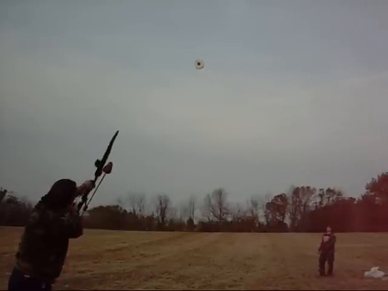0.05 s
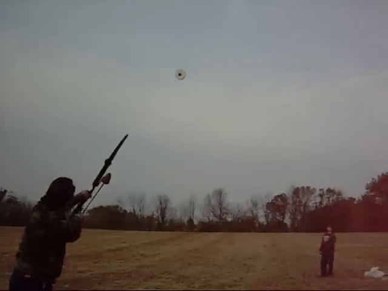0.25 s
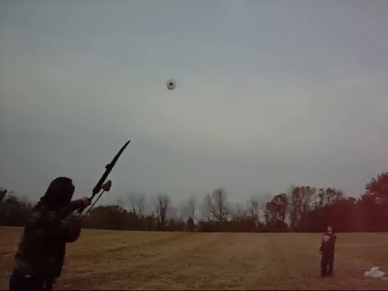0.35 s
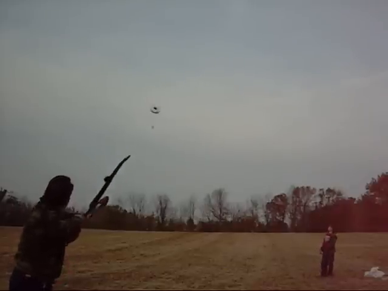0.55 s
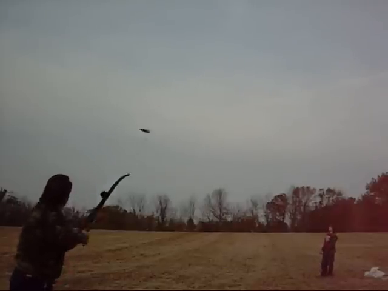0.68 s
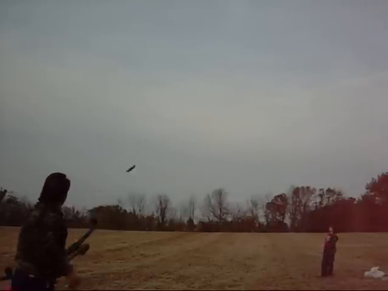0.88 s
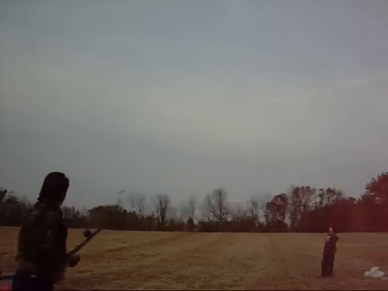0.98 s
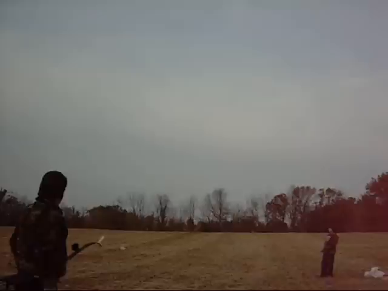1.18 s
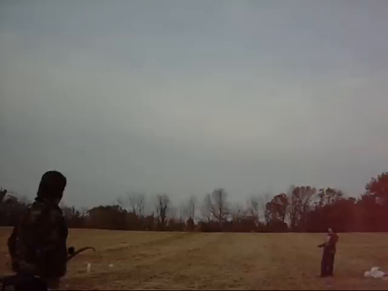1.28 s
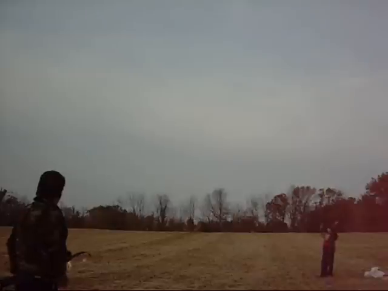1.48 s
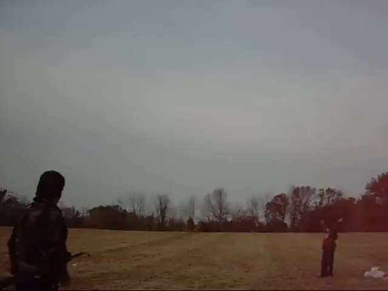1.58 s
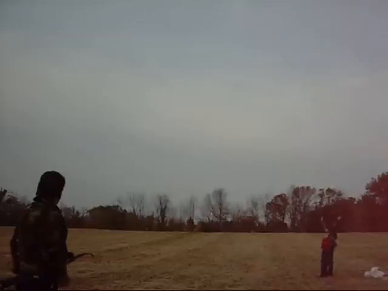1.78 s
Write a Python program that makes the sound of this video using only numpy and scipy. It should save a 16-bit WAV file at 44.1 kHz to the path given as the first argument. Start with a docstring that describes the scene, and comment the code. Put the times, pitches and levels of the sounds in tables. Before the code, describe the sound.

An arrow is shot outdoors: the string slaps the bow, feathers hiss briefly, and a hard crack marks the hit on a disc. Both cracks slightly overload a cheap microphone, followed by soft wind rumble and a quick rustle.

```python
"""An open field: wind hisses in far trees and rumbles on a small camera's microphone. An archer shoots at
a thrown disc: the string lets go and slaps the bow, the bushy fletching hisses away, and the arrow
cracks into the disc, its feathers shaking once. The camera's coarse recorder overloads on both cracks.
A second later a gust buffets the microphone and the bow is lowered with a short rustle."""
import sys
import numpy as np
from scipy import signal
from scipy.fft import rfft, irfft, next_fast_len
from scipy.io import wavfile
from scipy.ndimage import uniform_filter1d, map_coordinates

SR = 44100
rng = np.random.default_rng(int(sys.argv[2]) if len(sys.argv) > 2 else 0)


def master(y):
    """Save y as 16-bit WAV."""
    cut = np.clip(np.atleast_2d(y).T, -1, 1)
    pcm = np.round(cut * 32767)  # scale
    wavfile.write(sys.argv[1], SR, pcm.astype(np.int16))


N = 81585
HIT_S = 0.5331  # the arrow meets the disc
BLOW_S = .15  # room for the tail of one blow


def undb(db):
    """Decibels to gain."""
    return 10 ** (np.asarray(db) / 20)


def clock(length=N):
    """Time of every sample in seconds."""
    return np.arange(length) / SR


def add(track, start_s, sound):
    """Mix a short sound into a track."""
    i = int(start_s * SR)
    track[i:i + len(sound)] += sound


def fade(age, t60):
    """Exponential decay from age 0, silent before."""
    return (age >= 0) * np.exp(-np.log(1000) * np.maximum(age, 0) / t60)


def eq_curve(colour, size):
    """FFT bin frequencies and their gains along a curve of (frequency [Hz], level [dB]) points."""
    hz, db = np.array(colour).T
    freqs = np.maximum(np.arange(size // 2 + 1) * SR / size, 1)
    return freqs, undb(np.interp(np.log(freqs), np.log(hz), db))


def noise(colour, top_hz=8000):
    """Coloured noise of rms 1."""
    size = next_fast_len(N, True)
    freqs, gain = eq_curve(colour, size)
    coloured = irfft(rfft(rng.standard_normal(size)) * gain * (freqs < top_hz), size)[:N]
    return coloured / coloured.std()


def walk(rate_hz):
    """Smooth random wander with a spread of 1."""
    width = max(int(SR / rate_hz), 1)
    drift = uniform_filter1d(rng.standard_normal(N), width, mode="wrap")
    drift = uniform_filter1d(drift, width, mode="wrap")
    return (drift - drift.mean()) / drift.std()


def ring(modes):
    """Damped modes struck together; neighbours swing in opposite directions."""
    age = clock(int(BLOW_S * SR))
    return sum((-1) ** k * undb(db) * fade(age, t60) * np.sin(2 * np.pi * hz * age)
               for k, (hz, db, t60) in enumerate(modes))


def click(colour, size=2048):
    """A coloured click of peak 1, minimum-phase for a hard attack."""
    _, gain = eq_curve(colour, size)
    cepstrum = irfft(np.log(gain))
    causal = np.r_[cepstrum[0], 2 * cepstrum[1:size // 2]]
    pulse = irfft(np.exp(rfft(causal, size)))
    return pulse / np.abs(pulse).max()


def crack(pulse, snap_db, crackle_db, t60, spread_db=4.5):
    """One sharp snap followed by a dying crackle of tiny uneven clicks."""
    age = clock(int(BLOW_S * SR))
    snap = undb(snap_db) * (age == 0)
    grains = rng.standard_normal(len(age)) * undb(spread_db * rng.standard_normal(len(age)))
    crackle = undb(crackle_db) * fade(age, t60) * grains / grains.std() / np.linalg.norm(pulse)
    return signal.fftconvolve(snap + crackle, pulse)[:len(age)]


def trees():
    """The bed: air hisses steadily through the tree line, barely swelling."""
    # colour of the far trees and microphone hiss: (frequency [Hz], level [dB])
    colour = [(150, -14.5), (300, -17), (450, -13.5), (650, -3), (950, 1.5), (1400, -2), (2000, -7),
              (3000, -16), (4300, -21), (6500, -13), (7800, -21)]
    return undb(-35 + 0.25 * walk(rate_hz=2.8)) * noise(colour)


def microphone_wind():
    """Wind rumbles on the microphone; one gust breaks into short, brighter buffets."""
    # colour of the rumble: (frequency [Hz], level [dB])
    rumble_colour = [(12, -11.5), (25, -2.5), (42, -1.5), (70, -4), (110, -11), (170, -21), (300, -35.5),
                     (600, -60)]
    # rise and fall of the rumble: (time [s], level [dB])
    rumble_ride = [(0, -35), (.4, -39.5), (.58, -44), (.75, -37), (1.0, -36.5), (1.12, -34), (1.3, -37.5),
                   (1.46, -28.5), (1.5, -30.5), (1.56, -25), (1.64, -33), (1.85, -34.5)]
    # colour of a buffet: (frequency [Hz], level [dB])
    buffet_colour = [(30, -15), (70, -0.5), (150, -1), (250, -11), (380, -19.5), (600, -52), (1500, -70)]
    # buffets in the gust: (time [s], level [dB], half-length [s])
    buffets = [(1.423, -38, .03), (1.457, -24.5, 0.02), (1.489, -36, .008), (1.514, -25.5, 0.0086),
               (1.553, -29.5, .008), (1.576, -25, 0.0072), (1.586, -29, 0.011), (1.632, -31, 0.007),
               (1.681, -27, .008), (1.796, -34, .007)]
    t = clock()
    rumble = undb(np.interp(t, *np.array(rumble_ride).T)) * noise(rumble_colour)
    gust = sum(undb(db) * np.exp(-((t - peak_s) / half_s) ** 2) for peak_s, db, half_s in buffets)
    return rumble + gust * noise(buffet_colour)


def rustles():
    """Brief dry scuffs as the archer lowers the bow."""
    # scuffs: (peak time [s], level [dB], attack [s], t60 [s])
    scuffs = [(1.504, -31, .0005, .06), (1.509, -24.5, .0005, .028), (1.513, -31, .001, 0.024),
              (1.534, -35, .002, 0.029), (1.541, -39, .003, .04)]
    # colour of a scuff: (frequency [Hz], level [dB])
    colour = [(300, -17), (1500, -10), (2600, -5.5), (3200, 3.5), (4800, 0), (6200, -19), (7800, -16)]
    t, envelope = clock(), np.zeros(N)
    for peak_s, db, attack, t60 in scuffs:
        rise = np.exp(np.minimum(t - peak_s, 0) / attack)
        envelope += undb(db) * rise * fade(np.maximum(t - peak_s, 0), t60)
    return envelope * noise(colour)


def fletching():
    """The feathers flutter and hiss into the distance until the disc stops the arrow, then shake once."""
    # colour of air through the feathers: (frequency [Hz], level [dB])
    colour = [(100, -6.5), (350, -5.5), (500, -7.5), (950, -3), (1800, 0), (3400, 0.5), (4800, -3),
              (6200, -8.5), (7800, -19)]
    launch_s, speed_m_s, start_m = .262, 45, 2
    shake_s, shake_half_s = .576, .015
    t = clock()
    distance = start_m + speed_m_s * np.maximum(t - launch_s, 0)
    flight = (t > launch_s) * fade(np.maximum(t - HIT_S, 0), t60=.11) * start_m / distance
    shake = np.exp(-((t - shake_s) / shake_half_s) ** 4)
    flutter = undb(1.2 * walk(rate_hz=90))
    return (undb(-17) * flight + undb(-34) * shake) * flutter * noise(colour)


def bow():
    """The string slips free, then slaps home and rattles; every contact cracks and rings the bow."""
    # string on bow: (time [s], ring [dB], snap [dB], crackle [dB], crackle t60 [s])
    contacts = [(0.2466, -12, -4, -13.5, 0.074), (0.2516, -16, -10, -14, 0.036),
                (0.2577, -29, -6, -15, 0.02), (0.2583, -7, -7.5, -9.5, 0.0087),
                (0.2611, 0.5, 4.5, -1, 0.015), (0.2634, -8.5, -5.5, -19, 0.0056),
                (0.271, -20, -9, -24, 0.039)]
    # resonances of the bow: (frequency [Hz], level [dB], t60 [s])
    modes = [(317, -27, 0.081), (387, -32, 0.088), (527, -19.5, 0.029), (788, -17.5, .035),
             (1026, -27, 0.027), (1646, -12, 0.031), (1930, -13, 0.032), (2200, -15, 0.026),
             (2470, -17, .022), (2870, -4.5, 0.013), (3114, -7, 0.027), (3510, -18, 0.027),
             (3960, -12, 0.017), (4600, -10.5, .024), (4890, -6.5, 0.029)]
    # colour of the string's slap: (frequency [Hz], level [dB])
    colour = [(50, -36), (180, -16), (320, -6.5), (550, -1), (950, -3), (1300, -1.5), (2800, 2),
              (4100, -1.5), (5200, -2.5), (6500, -12.5), (7800, -19)]
    track, pulse, body = np.zeros(N), click(colour), ring(modes)
    for start_s, ring_db, snap_db, crackle_db, t60 in contacts:
        add(track, start_s, undb(ring_db) * body + crack(pulse, snap_db, crackle_db, t60))
    return track


def disc_hit():
    """The point punches into the disc: a sharp crack over a short hollow knock."""
    # resonances of the disc: (frequency [Hz], level [dB], t60 [s])
    modes = [(195, -24, 0.054), (295, -16.5, 0.059), (344, -12, 0.069), (648, -14, 0.049), (757, -15, .04),
             (984, -19.5, 0.048), (1116, -23, .04), (1655, -7, 0.023), (2110, -7.5, 0.023),
             (2325, -4.5, 0.025), (2635, -3.5, 0.024), (3720, -4.5, 0.022), (4270, -5.5, 0.019),
             (5340, -6.5, 0.026), (5720, -22.5, 0.015)]
    # colour of the arrow's crack: (frequency [Hz], level [dB])
    colour = [(60, -47), (130, -16), (300, -3.5), (900, 1), (1400, -3.5), (2500, -2), (5000, 0), (6200, -6),
              (7800, -12)]
    knock = undb(-1) * ring(modes)
    punch = crack(click(colour), snap_db=5, crackle_db=-10, t60=0.031)
    track = np.zeros(N)
    add(track, HIT_S, knock + punch)
    low_cut = signal.butter(2, 150, "high", fs=SR, output="sos")  # a small disc radiates little bass
    return signal.sosfilt(low_cut, track + 1e-18)


def scene():
    """Shot, flight, hit and rustle over the wind, in mono and dry in the open field."""
    return (bow() + fletching() + disc_hit() + rustles() + trees() + microphone_wind())[None]


def record(dry):
    """The camera samples slowly, clips and holds each sample, mirroring the sound into the high treble."""
    rate_hz, guard_hz, top_hz, ceiling = 16000, 7600, 15400, 0.9
    alias_guard = signal.ellip(8, .2, 60, guard_hz, fs=SR, output="sos")
    high_cut = signal.ellip(8, .1, 50, top_hz, fs=SR, output="sos")
    guarded = signal.sosfilt(alias_guard, dry[0])
    positions = np.arange(N * rate_hz // SR + 1) * SR / rate_hz
    samples = map_coordinates(guarded, [positions], mode="nearest")
    clipped = np.clip(samples, -ceiling, ceiling)
    held = clipped[np.arange(N) * rate_hz // SR]
    return signal.sosfiltfilt(high_cut, held)[None]


dry = scene()
out = record(dry)
master(out)
```